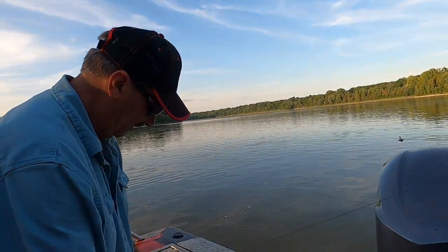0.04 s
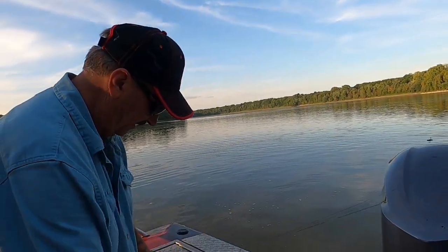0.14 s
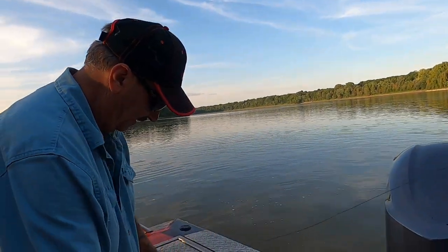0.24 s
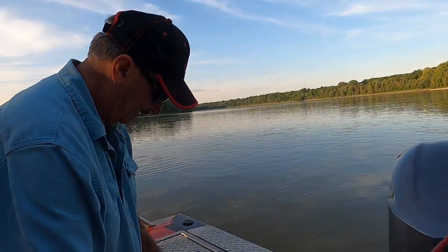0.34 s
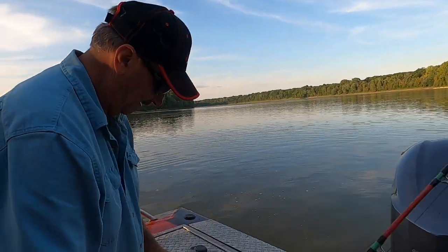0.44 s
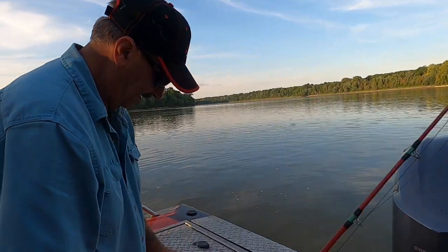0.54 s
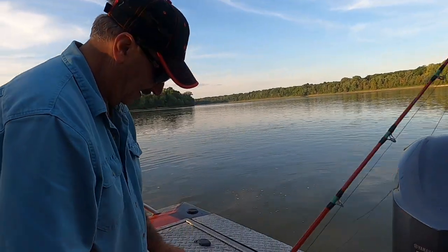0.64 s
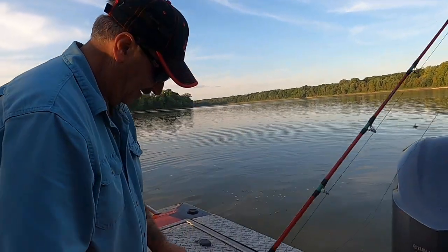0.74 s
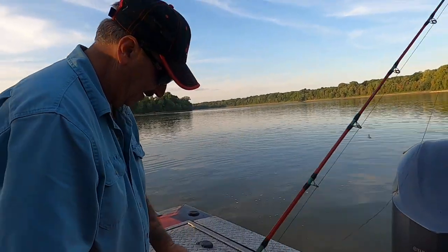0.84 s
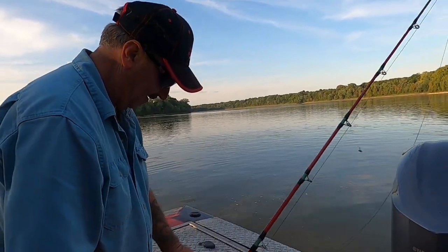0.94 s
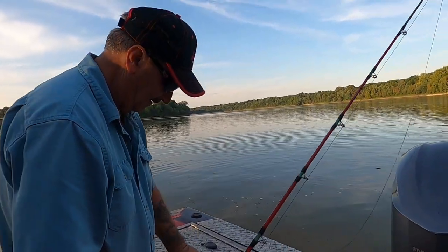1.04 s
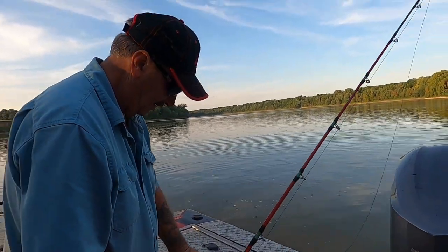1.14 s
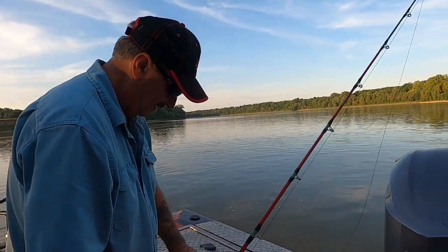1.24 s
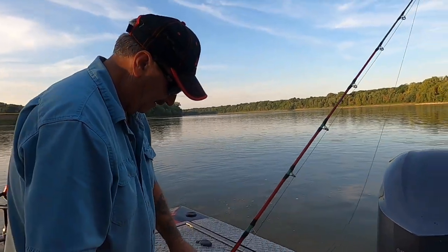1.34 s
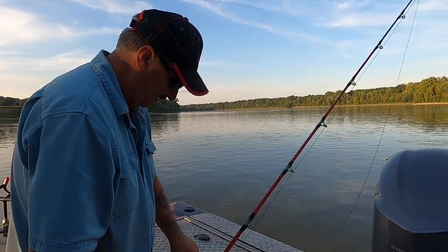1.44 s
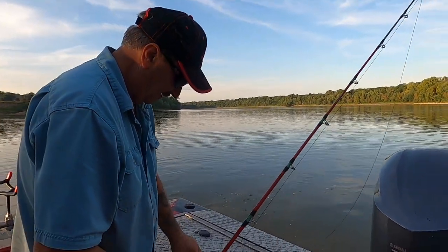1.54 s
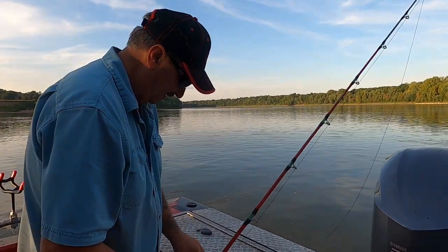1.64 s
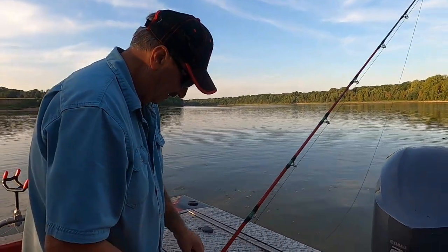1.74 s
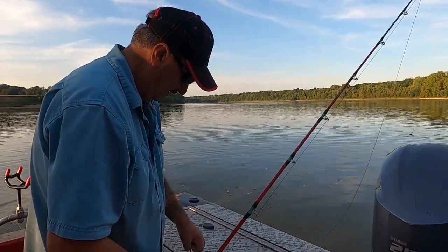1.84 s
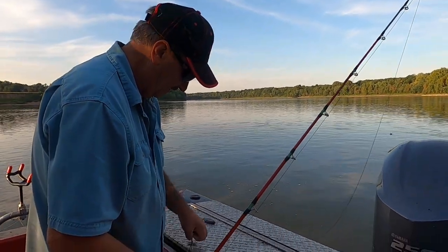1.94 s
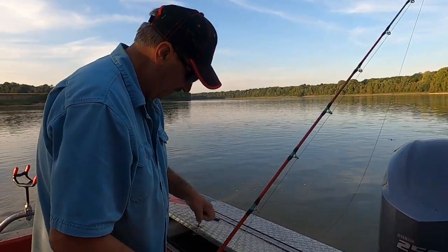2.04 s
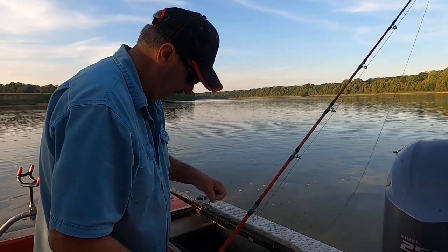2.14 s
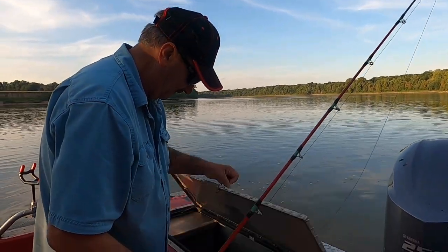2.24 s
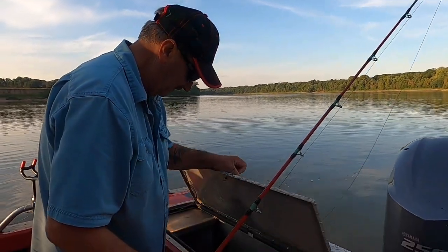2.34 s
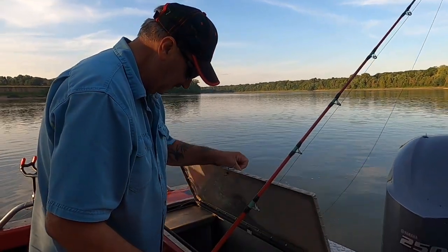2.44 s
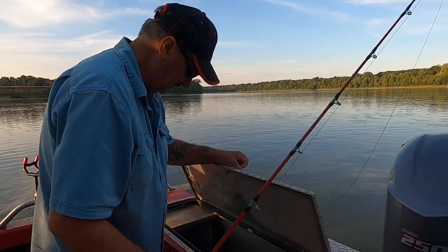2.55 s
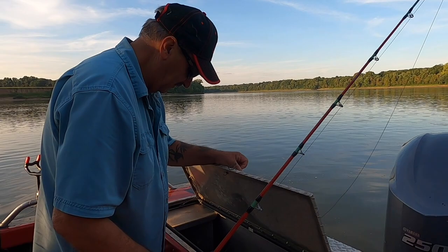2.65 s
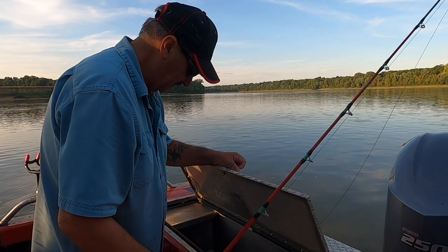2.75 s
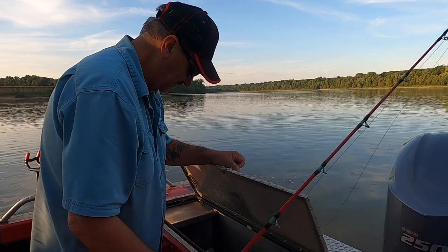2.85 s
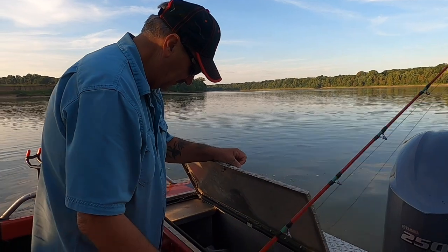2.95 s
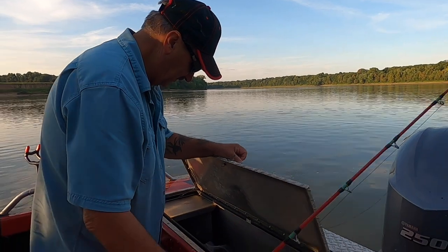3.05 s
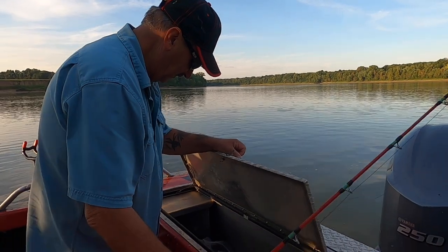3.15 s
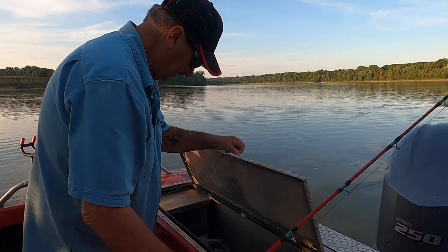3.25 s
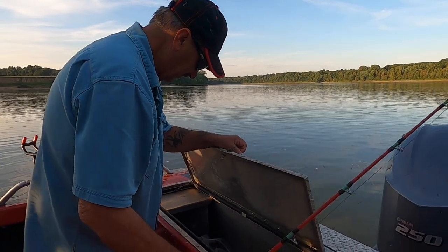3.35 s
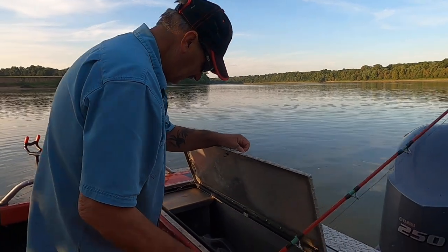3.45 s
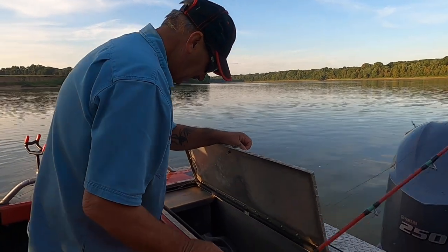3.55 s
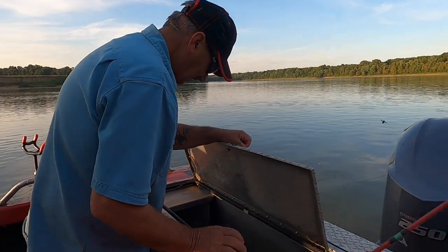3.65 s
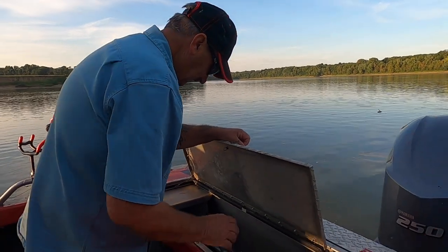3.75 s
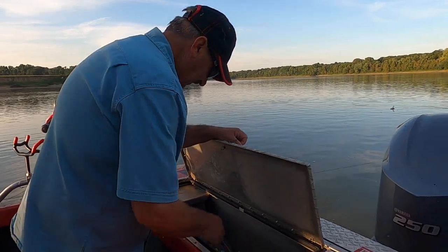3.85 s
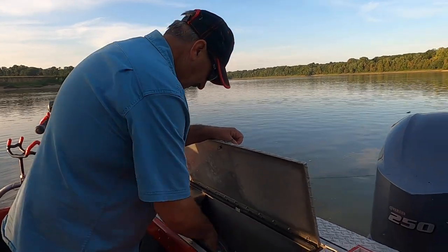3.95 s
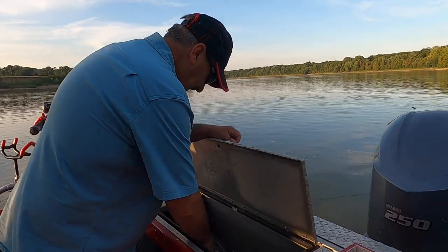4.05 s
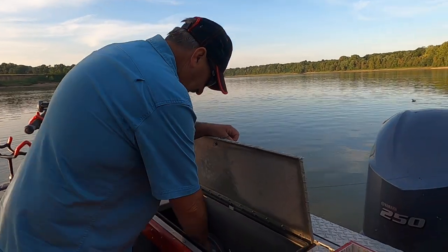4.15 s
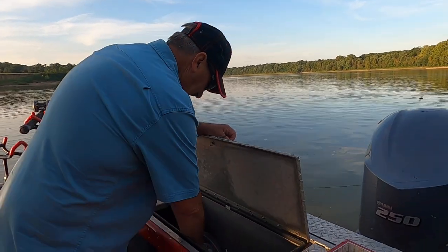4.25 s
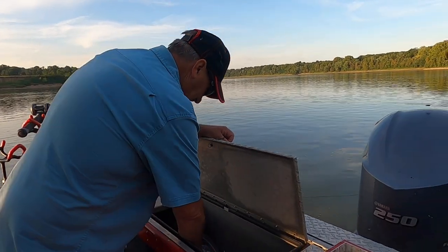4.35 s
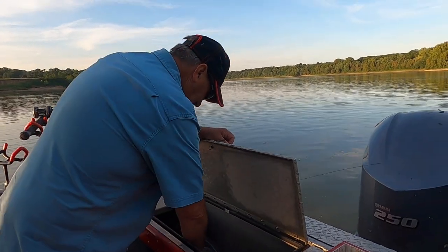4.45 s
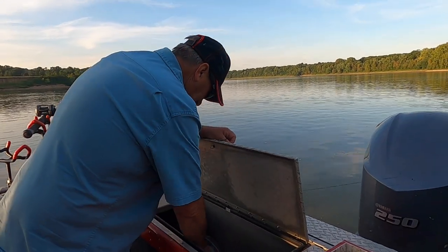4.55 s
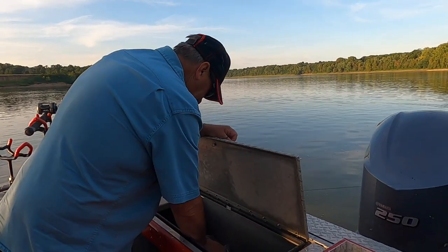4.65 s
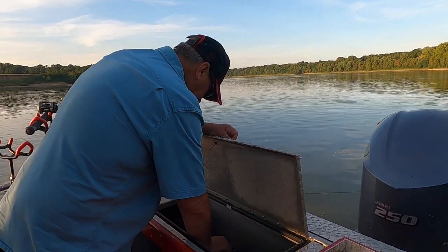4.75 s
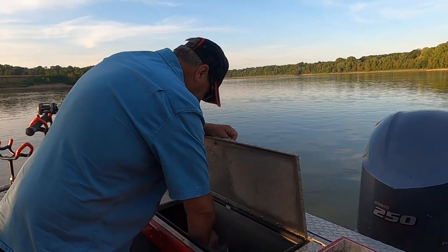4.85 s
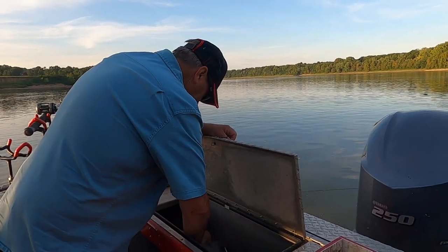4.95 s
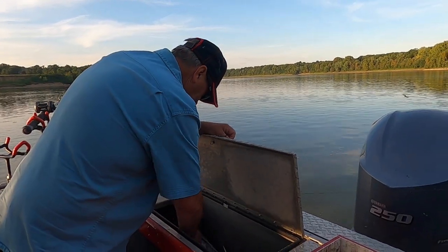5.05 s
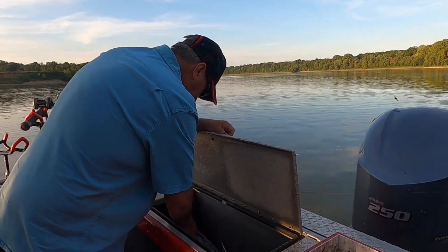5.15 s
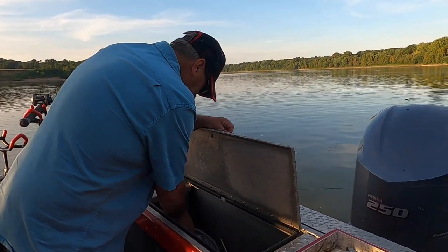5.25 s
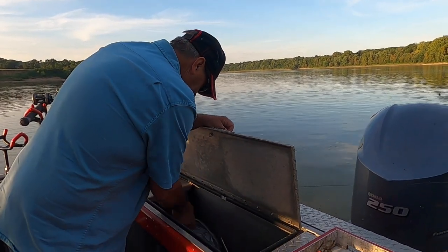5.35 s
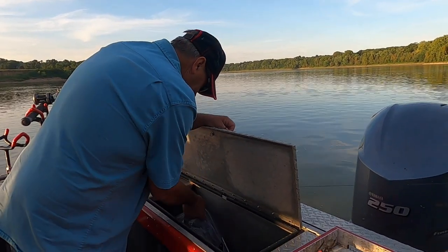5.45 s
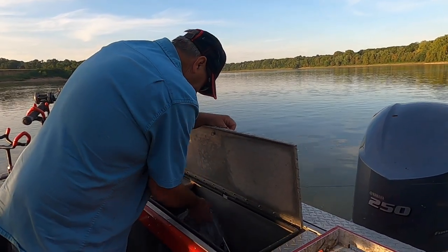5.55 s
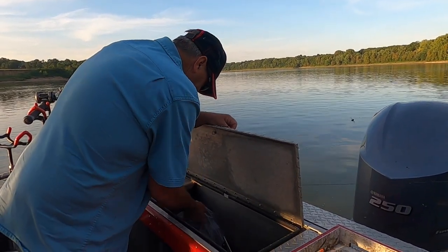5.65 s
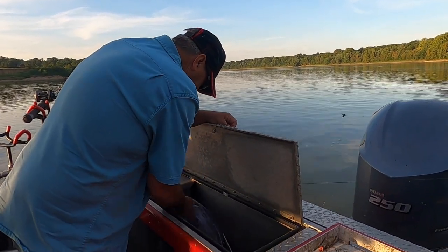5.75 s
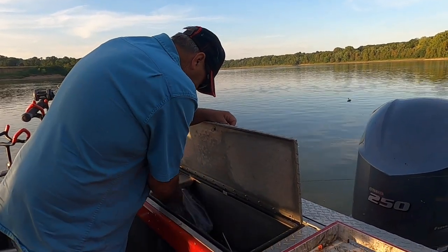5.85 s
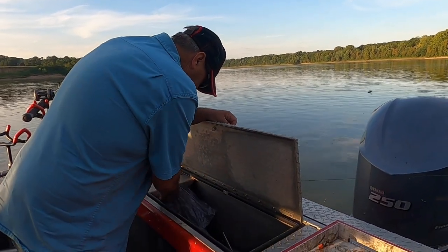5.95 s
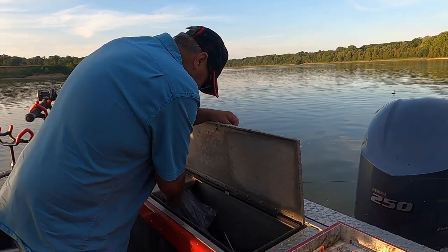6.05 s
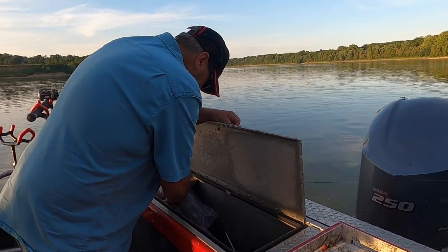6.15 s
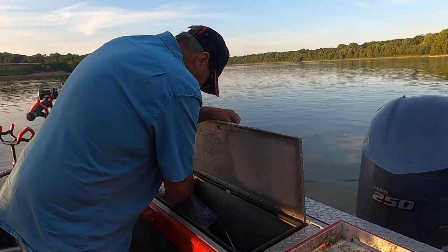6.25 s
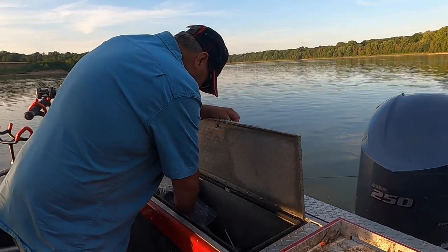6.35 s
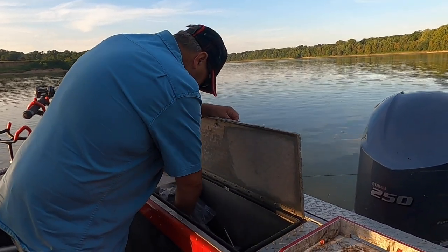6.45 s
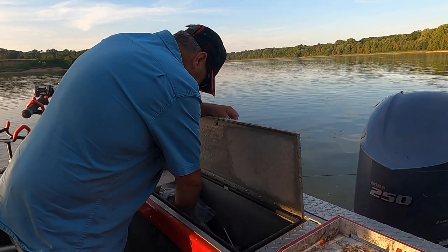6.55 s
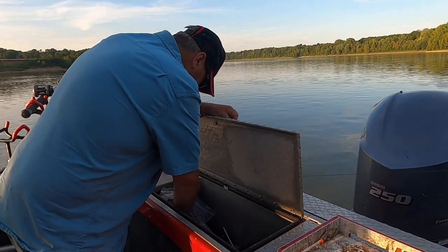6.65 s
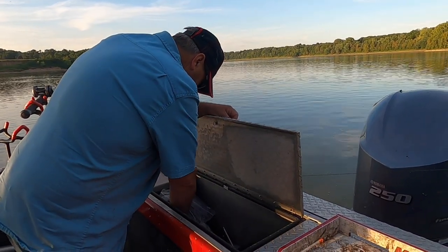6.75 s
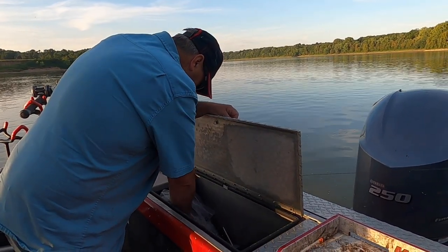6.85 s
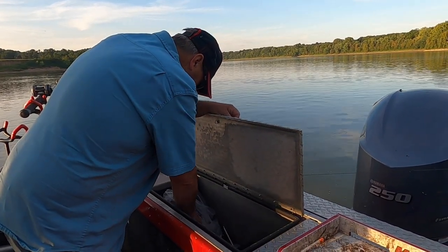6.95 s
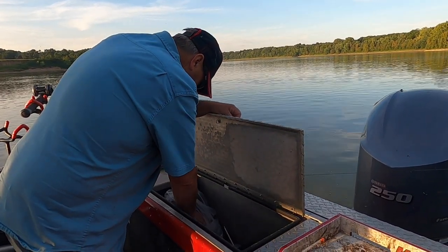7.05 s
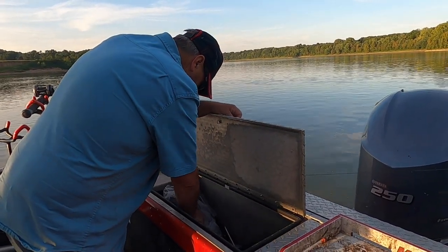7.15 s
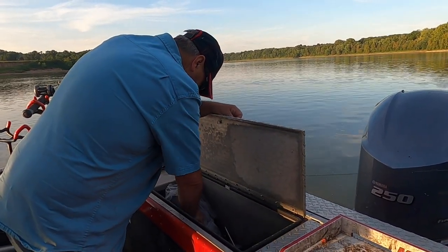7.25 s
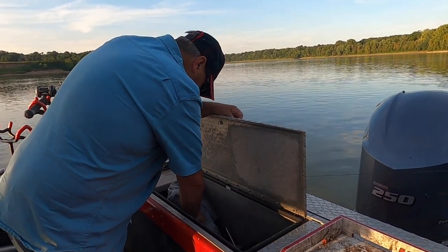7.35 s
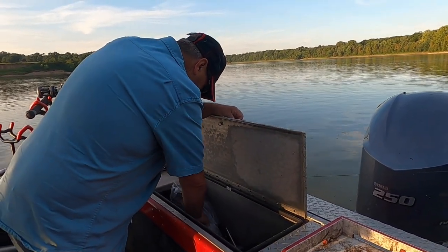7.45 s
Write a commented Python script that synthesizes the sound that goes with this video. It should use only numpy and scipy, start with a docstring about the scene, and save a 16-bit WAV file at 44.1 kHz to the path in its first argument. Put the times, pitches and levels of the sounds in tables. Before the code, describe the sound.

On a metal boat on a calm lake, fishing tackle and a latch click and rattle close to the microphone, with one bright spring ping. A metal hatch swings open with a hollow bang. Gear then knocks and scrapes inside the locker, and a hand rustles through crinkling plastic bags. A soft low rumble from the hull and faint, high insects continue underneath.

```python
"""A metal boat on a calm lake. A latch and tackle rattle, a hatch swings open with a bang,
then a hand knocks gear about in the locker and rustles through plastic bags.
Contact forces ring the fittings, latch plate, hatch panel, film and hull. The hull drums under
it all, air stirs on the two microphone ports and insects sing on the far shore."""
import sys
import numpy as np
from scipy import signal
from scipy.fft import rfft, irfft, next_fast_len
from scipy.io import wavfile

SR = 44100
rng = np.random.default_rng(int(sys.argv[2]) if len(sys.argv) > 2 else 0)


def wav_out(sig):
    """Save sig, one row per channel (or a flat mono array), as 16-bit PCM at SR to the path in sys.argv[1]."""
    wavfile.write(sys.argv[1], SR, np.round(np.clip(np.atleast_2d(sig).T, -1, 1) * 32767).astype(np.int16))


N = 330750
IR_SIZE = 8192


def from_db(db):
    """Decibels to gain."""
    return 10 ** (np.asarray(db) / 20)


def unit(x):
    """Scale to rms 1."""
    return x / np.sqrt(np.mean(x ** 2) + 1e-20)


def gain_curve(rows):
    """Gain per sample from (time [s], level [dB])."""
    return from_db(np.interp(np.arange(N) / SR, *np.transpose(rows)))


def at_hz(rows, size):
    """(frequency [Hz], value) on an FFT grid, log-frequency interpolation."""
    hz, values = np.transpose(rows)
    grid_hz = np.maximum(np.arange(size // 2 + 1) * SR / size, 1)
    return np.interp(np.log(grid_hz), np.log(hz), values)


def drift(rate_hz):
    """Unit normal random points joined by lines."""
    points = rng.standard_normal(int(rate_hz * N / SR) + 2)
    return np.interp(np.arange(N) * rate_hz / SR, np.arange(len(points)), points)


def gesture_power(rows, rise_db_per_s, fall_db_per_s):
    """Summed power of swells (start [s], hold [s], level [dB])."""
    t = np.arange(0, N + 64, 64) / SR
    start, hold, db = np.transpose(rows)[:, :, None]
    down_db = rise_db_per_s * np.maximum(start - t, 0) + fall_db_per_s * np.maximum(t - start - hold, 0)
    return np.interp(np.arange(N) / SR, t, np.sum(from_db(db - down_db) ** 2, axis=0))


def band(x, low_hz, high_hz):
    """Butterworth band-pass."""
    return signal.sosfilt(signal.butter(2, [low_hz, high_hz], "band", fs=SR, output="sos"), x)


def resonance(x, hz, width_hz):
    """Two-pole resonator, peak gain 1."""
    r = np.exp(-np.pi * width_hz / SR)
    gain = (1 - r * r) / 2
    return signal.lfilter([gain, 0, -gain], [1, -2 * r * np.cos(2 * np.pi * hz / SR), r * r], x)


def pulse(spectrum):
    """Minimum-phase pulse with the given spectrum."""
    cepstrum = irfft(np.log(from_db(at_hz(spectrum, IR_SIZE))))
    cepstrum[1:IR_SIZE // 2] *= 2
    cepstrum[IR_SIZE // 2 + 1:] = 0
    return irfft(np.exp(rfft(cepstrum)))


def click(low_hz, high_hz):
    """Band-passed impulse."""
    return band(signal.unit_impulse(IR_SIZE), low_hz, high_hz)


def body(modes, attack, attack_db):
    """Impulse response: decaying modes plus a broadband attack."""
    t = np.arange(IR_SIZE) / SR
    ring = sum(from_db(db - 60 * t / t60) * np.sin(2 * np.pi * hz * t) * (-1) ** k
               for k, (hz, db, t60) in enumerate(modes))
    return unit(ring) + from_db(attack_db) * unit(attack)


def excite(force, response):
    """Convolve a force pair with a response scaled to energy 1."""
    return signal.fftconvolve(force, unit(response)[None] / np.sqrt(IR_SIZE))[:, :N]


def insects(hz=6780, width_hz=590, level_db=-67.5):
    """Far chorus: narrowband noise, independent left and right."""
    noise = rng.standard_normal((2, N))
    return from_db(level_db) * unit(resonance(resonance(noise, hz, width_hz), hz, width_hz))


# still air: (frequency [Hz], relative density [dB])
AIR_SPECTRUM = [(12, -42), (20, -23), (43, 13.5), (121, -20), (164, 4), (229, -26.5), (398, -38),
                (5690, -54), (6720, -29), (7720, -31), (15000, -88.5)]


def still_air(level_db=-66.5):
    """Faint low murmur and hiss, mono."""
    spectrum = rfft(rng.standard_normal(N)) * from_db(at_hz(AIR_SPECTRUM, N))
    return from_db(level_db) * unit(irfft(spectrum, N))


# hull air and plates: (frequency [Hz], width [Hz], gain [dB])
BOOM_MODES = [(61.1, 40, 4.5), (113.3, 16, 1.5), (152, 44, -2), (232.4, 15, 2)]
# air on the ports, water under the hull: (time [s], level [dB])
BREEZE = [(0, -45), (1.17, -45.5), (1.5, -51.5), (2.25, -47.5), (3.0, -54.5), (4.5, -52.5), (5.4, -50),
          (5.93, -43.5), (6.4, -45.5), (7.5, -45)]
# weight shifts or gear lands: (start [s], hold [s], level [dB])
LURCHES = [(0, 0.015, -32), (2.4, 0.11, -30), (3.28, 0.021, -40), (3.72, 0.23, -35), (4.03, 0.079, -28.5),
           (4.8, 0.074, -30.5), (5.18, 0.044, -40.5)]


def rumble():
    """Lumpy noise in the deep hull modes plus air flutter; lurches drive the hull only."""
    push = rng.standard_normal((2, N)) * from_db(2.8 * drift(15))
    boom = sum(from_db(db) * resonance(push, hz, width) * (-1) ** k
               for k, (hz, width, db) in enumerate(BOOM_MODES))
    boom = unit(band(band(boom, 50, 330), 41, 217))
    flutter = unit(band(rng.standard_normal((2, N)), 22, 110))
    breeze = gain_curve(BREEZE)
    lurch_power = gesture_power(LURCHES, rise_db_per_s=155, fall_db_per_s=72.5)
    boom_gain = np.sqrt((from_db(-1) * breeze) ** 2 + lurch_power)
    return boom_gain * boom + from_db(-3) * breeze * flutter


# blows on hull plates: (time [s], level [dB], pitch [Hz], t60 [s])
THUMPS = [(0.002, -27.5, 439, 0.071), (0.004, -25.5, 145, 0.084), (1.249, -35.5, 131, 0.52),
          (1.875, -25.5, 414, 0.11), (1.88, -30, 71.3, 0.4), (2.357, -23, 245, 0.26),
          (2.395, -10, 99, 0.22), (2.437, -16.5, 85.1, 0.39), (2.489, -16.5, 239, 0.26),
          (2.31, -32.5, 468, .2), (2.404, -18.5, 489, 0.27), (2.619, -37, 456, 0.21),
          (3.208, -26, 156.6, 0.17), (3.209, -41, 449, 0.38), (3.677, -21.5, 157.5, 0.25),
          (3.724, -24, 74.3, 0.24), (3.80, -21.5, 585, 0.21), (3.808, -21, 184.5, 0.16),
          (3.86, -30, 606, 0.26), (3.998, -25.5, 89.5, 0.18), (4.07, -26.5, 73.5, 0.15),
          (4.148, -14.5, 194.4, 0.16), (4.764, -28, 143, 0.3), (4.884, -16, 102.6, 0.27),
          (5.171, -24, 149.3, 0.34), (5.2, -25.5, 223.6, 0.16), (5.502, -29, 230.7, 0.27),
          (5.852, -29, 234.7, 0.49), (5.988, -16.5, 223, 0.11), (6.111, -31.5, 217.4, 0.4)]


def hull_thumps(rise_s=0.0024):
    """A soft blow rings a close pair of plate modes and an overtone."""
    out, t = np.zeros(N + SR), np.arange(SR) / SR
    for s, db, hz, t60 in THUMPS:
        ring = sum(gain * np.sin(2 * np.pi * hz * ratio * t)
                   for ratio, gain in [(1, 0.73), (1.13, 0.29), (2.3, 0.13)])
        out[round(s * SR):][:SR] += from_db(db - 60 * t / t60) * (1 - np.exp(-t / rise_s)) * ring
    return out[:N]


# hull: (frequency [Hz], gain [dB], t60 [s])
HULL_MODES = [(315, 15.5, 0.18), (478, 1, 0.23), (507, 0, 0.18), (609, 11, 0.071), (651.5, 7.5, 0.14),
              (812.6, 5.5, 0.2), (980, 6.5, 0.096)]


def hull(force):
    """Low-mid ring of the metal hull."""
    return excite(force, body(HULL_MODES, click(262, 820), attack_db=6.5))


# hatch panel: (frequency [Hz], gain [dB], t60 [s])
PANEL_MODES = [(1131, 0, 0.18), (1292, -4.5, 0.1), (1490, 13, 0.037), (1890, 6.5, 0.11), (2226, -1, 0.094),
               (2580, 5.5, 0.067)]


def panel(force):
    """Midrange clank of the hatch panel."""
    return excite(force, body(PANEL_MODES, click(923, 2065), attack_db=4.7))


# snap of plastic film: (frequency [Hz], relative density [dB])
FILM_SPECTRUM = [(1180, -18), (2000, -6), (3880, -6), (4650, -8), (6030, -15.5), (7410, -19), (8580, -17),
                 (12100, -30.5), (15700, -42)]


def film(force):
    """Plastic film: a bright snap with no modes."""
    return excite(force, pulse(FILM_SPECTRUM))


def creases(rate_hz, fade_s=0.0014):
    """Force of tiny creases: clumped, dying noise bursts of uneven size."""
    sizes = from_db(3.5 * np.minimum(rng.exponential(1, N), 4))
    starts = sizes * (rng.random(N) < rate_hz * from_db(3.5 * drift(60)) / SR)
    envelope = signal.lfilter([1], [1, -np.exp(-1 / (fade_s * SR))], starts + 1e-18)
    return unit(envelope * rng.standard_normal((2, N)))


# fingers and sleeve on latch, lid and bags: (time [s], level [dB])
BRUSHING = [(0, -56.5), (.08, -76.5), (.25, -66), (.62, -72.5), (1.13, -64), (1.62, -65.5), (1.88, -57.5),
            (2.25, -74), (2.66, -65.5), (3.04, -76), (3.62, -61), (4.3, -72.5), (4.6, -53), (5.0, -59.5),
            (5.6, -49), (6.15, -55), (6.32, -53.5), (6.35, -66.5), (6.385, -52), (7.5, -54)]
# hand crumples plastic: (start [s], hold [s], level [dB])
GRIPS = [(2.32, 0.17, -50.5), (3.745, .02, -53.5), (3.95, 0.0064, -44.5), (4.07, 0.077, -45),
         (4.38, 0.0079, -52), (4.46, 0.028, -51.5), (4.75, 0.034, -42), (4.88, 0.034, -45),
         (5.11, 0.13, -46), (5.32, 0.0072, -45), (5.43, .04, -49.5), (5.5, 0.0044, -33.5),
         (5.72, 0.027, -40.5), (5.85, 0.096, -39.5), (5.99, 0.0027, -35), (6.13, 0.036, -50),
         (6.44, 0.038, -51.5), (6.57, 0.003, -35.5), (6.74, 0.0021, -40.5), (6.85, 0.017, -47.5),
         (6.95, 0.028, -39), (7.08, 0.08, -49.5), (7.2, 0.031, -47.5), (7.3, 0.038, -46.5)]
# lid and heavy gear drag on metal: (start [s], hold [s], panel level [dB], hull offset [dB])
DRAGS = [(2.416, 0.09, -38, -3), (3.699, 0.055, -38.5, -1), (3.845, 0.092, -40.5, 5),
         (3.987, 0.19, -35.5, 4.5), (4.804, 0.11, -41.5, 3.5), (5.109, 0.068, -46, -5),
         (5.842, 0.14, -39, -7), (6.115, 0.042, -46, -1.5), (7, 0.048, -46, 4.5)]


def handling():
    """Brushing, grips and drags rub film, panel and hull; a harder hand adds more creases."""
    brush = gain_curve(BRUSHING) ** 2
    grip = gesture_power(GRIPS, rise_db_per_s=206.5, fall_db_per_s=196)
    drag_slopes = dict(rise_db_per_s=347, fall_db_per_s=318)
    panel_drag = gesture_power([(s, hold, db) for s, hold, db, _ in DRAGS], **drag_slopes)
    hull_drag = gesture_power([(s, hold, db + offset) for s, hold, db, offset in DRAGS], **drag_slopes)
    film_gain = np.sqrt(brush + grip)
    panel_gain = np.sqrt(brush * from_db(-2.5) ** 2 + grip * from_db(-3.5) ** 2 + panel_drag)
    hull_gain = np.sqrt(brush * from_db(-10.5) ** 2 + grip * from_db(-11) ** 2 + hull_drag)
    crispness = np.clip((20 * np.log10(film_gain) + 68) / 18, .15, 1)
    rub = rng.standard_normal((3, 2, N))
    pitched = sum(resonance(creases(280), hz, 0.33 * hz) for hz in np.geomspace(1800, 13000, num=6))
    rub[0] = .5 * rub[0] + crispness * (.4 * creases(300) + .8 * unit(pitched))
    rub[1:] = unit(rub[1:] + 0.8 * crispness * creases(200))
    on_film, on_panel, on_hull = rub * from_db(3.13 * drift(60))
    return film(film_gain * on_film) + panel(panel_gain * on_panel) + hull(hull_gain * on_hull)


# locker air: (frequency [Hz], width [Hz], gain [dB])
LOCKER_MODES = [(223.8, 19, 5.5), (317.2, 21, -4.5)]
# hum: (time [s], level [dB])
LOCKER_LEVEL = [(0, -69), (2.3, -65), (4.3, -53), (5.4, -47.5), (7.5, -50)]


def locker_hum():
    """Uneven noise in the air modes of the locker, louder once it is open."""
    stir = rng.standard_normal((2, N)) * from_db(2.5 * drift(18))
    hum = sum(from_db(db) * resonance(resonance(stir, hz, width), hz, 3 * width)
              for hz, width, db in LOCKER_MODES)
    return gain_curve(LOCKER_LEVEL) * unit(hum)


def contact_forces(rows):
    """Tick, plate and hull forces: rough bursts, slower and longer in the lower bodies."""
    forces = np.zeros((3, 2, N + SR))
    t = np.arange(SR // 5) / SR
    hard_onset = 1 + 1.26 * np.exp(-t / 0.0029)
    for s, db, plate_db, hull_db, tick_hz, t60 in rows:
        start = round(s * SR)
        softness = from_db(-.35 * min(db + 12.5, 0))   # light contacts slide in
        rough = rng.standard_normal((3, 2, len(t)))
        spot_hz = rng.uniform(866, 2647)   # each spot favours other modes
        rough[0] = unit(rough[0] + 0.69 * unit(resonance(rough[0], tick_hz, 0.43 * tick_hz)))
        rough[1] = unit(rough[1] + 0.38 * unit(resonance(rough[1], spot_hz, 300)))
        bounces = from_db(1.82 * drift(350)[start % (N - len(t)):][:len(t)])
        rough[:2] *= hard_onset * bounces
        paths = [(db - 16.5, 1.1 * t60, .0015),
                 (db + plate_db - 13.5, 1.25 * t60, .002),
                 (db + hull_db - 3.5, 1.8 * t60, .006)]
        for k, (level_db, t60_s, rise_s) in enumerate(paths):
            envelope = from_db(level_db - 60 * t / t60_s) * (1 - np.exp(-t / (rise_s * softness)))
            forces[k, :, start:start + len(t)] += envelope * rough[k]
    return forces[..., :N]


# latch, tackle and hatch contacts:
# (time [s], level [dB], plate offset [dB], hull offset [dB], tick pitch [Hz], base t60 [s])
CLACKS = [(0.2808, -39.5, -8.5, -7, 3900, 0.049), (0.5576, -4.5, -20, -27, 5290, 0.059),
          (0.636, -6.5, -12, -25, 4660, 0.072), (0.6492, -15, -8, -26.5, 5090, 0.17),
          (0.6762, -13.5, -12, -28, 4240, 0.055), (0.806, -43, -7, -30, 3500, .05),
          (0.828, -27, -2.5, -20, 5030, 0.053), (0.854, -23.5, -6.5, -30, 4400, 0.089),
          (0.902, -32, -2, -20, 4940, 0.14), (0.9494, -22.5, -2, -21, 4800, 0.066),
          (0.9683, -30, -6, -32, 4700, 0.071), (1.0254, -34.5, -1.5, -30, 4820, 0.068),
          (1.067, -30, -23, -38, 3600, 0.04), (1.121, -35, -6, -36, 3700, 0.15),
          (1.1863, -30.5, -10, -34, 3500, 0.17), (1.215, -36.5, -7.5, -32.5, 7500, 0.061),
          (1.2332, -8.5, -5.5, -21, 5270, 0.057), (1.2485, -12, -9, -11.5, 4930, 0.046),
          (1.2721, -20.5, -4, -19.5, 4900, 0.11), (1.3453, -35, -1.5, -10, 4700, 0.055),
          (1.705, -18.5, -3, -8.5, 5240, 0.04), (1.719, -18.5, -7, -10, 3700, 0.061),
          (1.7617, -35, -4, -22, 3830, 0.17), (1.816, -31.5, -5.5, -35, 4400, 0.17),
          (1.8571, -21, -9, -9, 4630, 0.08), (1.862, -7, -8.5, -27, 5000, 0.046),
          (1.975, -45, -22, -33, 4000, 0.18), (2.113, -33, -35, -41, 4070, 0.078),
          (2.2934, -41, -3, 8, 3076, 0.099), (2.3206, -21.5, -11, -12.5, 3180, 0.17),
          (2.3627, -8.5, -12.5, -8.5, 4110, 0.047), (2.395, -5, -7.5, 3, 3730, 0.044),
          (2.433, -15.5, 9, 7.5, 3620, 0.053), (2.4658, -14.5, -7.5, -1, 4370, 0.12),
          (2.4994, -19.5, -2.5, -4, 3460, 0.078), (2.5345, -22, -14, -7, 4020, 0.11),
          (2.6294, -39.5, -20, 8.5, 3720, 0.069), (2.6886, -38.5, 1, -0.5, 4900, 0.061),
          (3.1936, -22.5, -0.5, -13, 2760, 0.068), (3.2473, -41.5, 8, 4, 2900, 0.051),
          (3.291, -45.5, 15, -7, 2900, 0.048)]
# metal on metal: (frequency [Hz], relative density [dB])
CRACK_SPECTRUM = [(1180, -24.5), (2000, -13.5), (2800, -4), (3950, -2), (4900, -2.5), (6860, -13),
                  (9270, -15.5), (12500, -33), (15700, -50)]
# small metal parts: (frequency [Hz], gain [dB], t60 [s])
FITTING_MODES = [(3650, -8, .03), (3950, -6, .03), (4610, -4, .03), (4800, -4, .035), (5150, -4, .03)]
# latch plate: (frequency [Hz], gain [dB], t60 [s])
LATCH_MODES = [(1170, 3.5, 0.055), (1608, 3.5, 0.047), (1792, 1, 0.04)]


def metal_clacks():
    """Latch, tackle and hatch strike metal, ringing fittings, latch plate and hull."""
    on_fittings, on_latch, on_hull = contact_forces(CLACKS)
    fittings = excite(on_fittings, body(FITTING_MODES, pulse(CRACK_SPECTRUM), attack_db=12))
    latch = excite(on_latch, body(LATCH_MODES, click(1200, 2340), attack_db=3))
    return fittings + latch + hull(on_hull)


# spring snaps: (time [s], level [dB])
PINGS = [(1.2343, -34), (1.7187, -41), (1.8625, -15.5)]
# latch spring: (frequency [Hz], gain [dB], t60 [s])
SPRING_MODES = [(1620, 0, 0.062), (3200, -12, 0.075), (3720, -9, 0.048), (4580, -2, 0.077),
                (4960, 2.5, 0.0603)]


def spring_pings(rise_s=0.0011):
    """The latch spring snaps and rings in clear modes."""
    out, t = np.zeros(N + SR), np.arange(SR // 4) / SR
    ring = sum(from_db(db - 60 * t / t60) * np.sin(2 * np.pi * hz * t) for hz, db, t60 in SPRING_MODES)
    ping = (1 - np.exp(-t / rise_s)) * ring / np.max(np.abs(ring))
    for s, db in PINGS:
        out[round(s * SR):][:len(t)] += from_db(db) * ping
    return out[:N]


# gear contacts:
# (time [s], level [dB], panel offset [dB], hull offset [dB], tick pitch [Hz], base t60 [s])
KNOCKS = [(3.6635, -11.5, 3, -11.5, 2640, 0.046), (3.6755, -19, 8, -5, 1900, 0.025),
          (3.7249, -34, 20, 13.5, 2310, 0.073), (3.7942, -16.5, 2.5, -12, 2760, 0.08),
          (3.934, -11, -26, -28, 4730, 0.071), (3.948, -8.5, -9, -7.5, 4300, 0.051),
          (3.9658, -11.5, 0, -8, 2280, 0.07), (3.9998, -15, 5.5, -4, 2450, 0.12),
          (4.0144, -16, 7, 6, 2410, 0.039), (4.0497, -13, 2, -9, 3490, 0.034),
          (4.0928, -14.5, -4.5, -7, 2440, 0.19), (4.128, -11, -2.5, -23, 2420, 0.12),
          (4.1474, -17, -22, -6, 2420, 0.11), (4.4438, -10.5, -11, -35.5, 2300, 0.016),
          (4.4574, -22, 0, -18.5, 2390, 0.12), (4.4917, -16, -5, -30, 2160, 0.022),
          (4.53, -32, 6, -20, 1500, .02), (4.607, -27.5, -7, -25, 3470, 0.028),
          (4.659, -28.5, 9, 7, 1500, 0.017), (4.7262, -9, -6.5, -31, 2250, 0.019),
          (4.7535, -8, -7, -18, 2130, 0.098), (4.7794, -15.5, -13, -19, 2490, 0.088),
          (4.8339, -18.5, 0, -23, 2250, 0.051), (4.8705, -9.5, -1, -5.5, 2180, 0.086),
          (5.163, -21.5, 1, -7, 1880, 0.083), (5.1993, -14, -8.5, -15, 4970, 0.043),
          (5.2886, -23, -14, -18, 2360, 0.068), (5.4944, -22.5, 3, -21, 3720, 0.078),
          (5.5077, -17, 1, -5.5, 2380, 0.045), (5.8561, -19, -2, -5, 2300, 0.036),
          (5.9953, -13, -4.5, -2.5, 2230, 0.047), (6.534, -18.5, 0.5, -16, 2680, 0.1),
          (6.5628, -16.5, 5, -4.5, 2600, 0.059), (6.734, -18.5, -5, -12, 4500, 0.022),
          (6.986, -16.5, -7, -1, 2230, 0.02), (7.3032, -22.5, 0, -9.5, 2570, 0.032),
          (7.362, -13.5, -18, -24, 4470, 0.014), (7.49, -23.5, 5.5, -6, 2400, 0.019)]


def gear_knocks():
    """Gear in the locker jolts bags, hatch panel and hull."""
    on_film, on_panel, on_hull = contact_forces(KNOCKS)
    return film(on_film) + panel(on_panel) + hull(on_hull)


# single folds of film: (time [s], level [dB])
FOLDS = [(5.1054, -34), (5.3143, -19), (5.4164, -25), (5.465, -30), (5.4817, -23), (5.5834, -23),
         (5.6394, -28.5), (5.7199, -20), (5.746, -18), (5.8316, -20), (5.967, -20), (5.9844, -13.5),
         (6.0861, -35), (6.4368, -25), (6.5166, -19.5), (6.6074, -34), (6.836, -27), (6.9336, -29),
         (7.0404, -21), (7.1192, -25), (7.2464, -31), (7.4077, -24)]


def fold_snaps(fade_s=0.0074):
    """Each snapping fold is a short burst of force on the film."""
    force, t = np.zeros((2, N + SR)), np.arange(SR // 40) / SR
    for s, db in FOLDS:
        burst = np.exp(-t / fade_s) * rng.standard_normal((2, len(t)))
        force[:, round(s * SR):][:, :len(t)] += from_db(db - 13) * burst
    return film(force[:, :N])


# left-right likeness: (frequency [Hz], correlation [0..1])
PORT_CORRELATION = [(30, 0.84), (100, 0.99), (500, 0.93), (2000, 0.94), (5000, 0.78), (9000, 0.6),
                    (15000, 0.4)]
# left minus right: (frequency [Hz], level [dB])
PORT_BALANCE = [(60, 1), (300, -0.4), (1000, -1.2), (2000, 0.3), (4000, 1), (8000, -1.5), (14000, -6)]
# left minus right: (frequency [Hz], phase [rad])
PORT_PHASE = [(60, -.03), (300, -.09), (860, -.4), (4000, -.9), (7500, -1.3), (14000, -2.2)]


def ports(pair):
    """Two close microphone ports: a (shared, opposed) pair becomes left and right."""
    size = next_fast_len(N + SR // 4)
    alike = np.clip(at_hz(PORT_CORRELATION, size), 0, 1)
    side = np.array([[.5], [-.5]])
    placement = from_db(side * at_hz(PORT_BALANCE, size)) * np.exp(1j * side * at_hz(PORT_PHASE, size))
    shared, opposed = rfft(pair, size)
    mix = np.sqrt((1 + alike) / 2) * shared + 2 * side * np.sqrt((1 - alike) / 2) * opposed
    return irfft(placement * mix, size)[:, :N]


def scene():
    """The boat through the ports, insects and air around it."""
    boat = metal_clacks() + gear_knocks() + handling() + fold_snaps() + rumble() + locker_hum()
    boat[0] += hull_thumps() + spring_pings()   # shared part only
    return ports(boat) + insects() + still_air()


def record(dry):
    """Steep elliptic low-pass."""
    cutoff_hz = 15800
    return signal.sosfilt(signal.ellip(12, .5, 70, cutoff_hz, fs=SR, output="sos"), dry)


dry = scene()
out = record(dry)
wav_out(out)
```